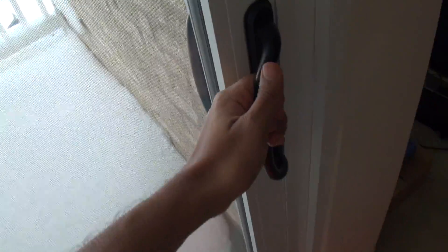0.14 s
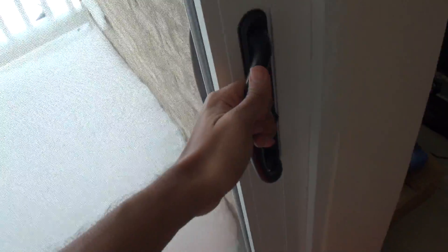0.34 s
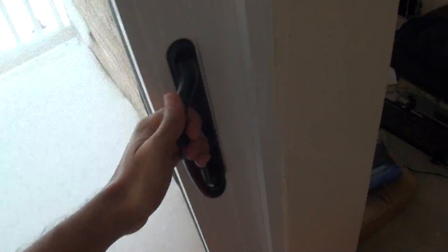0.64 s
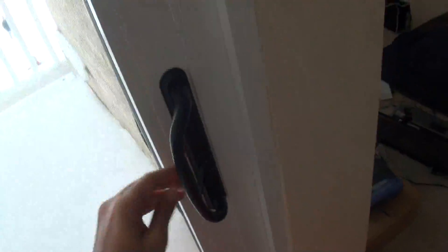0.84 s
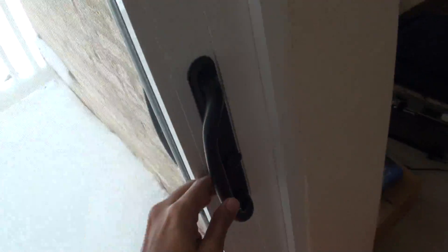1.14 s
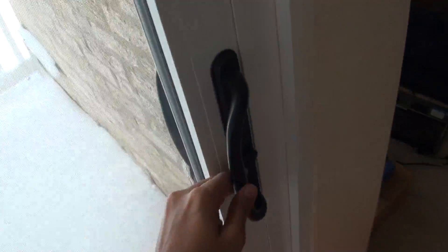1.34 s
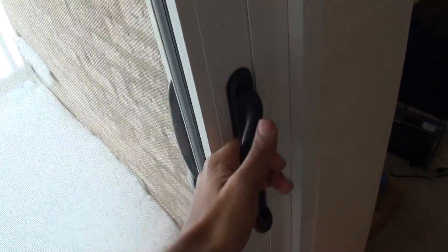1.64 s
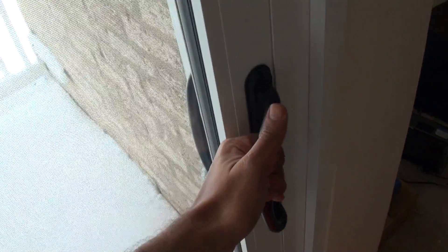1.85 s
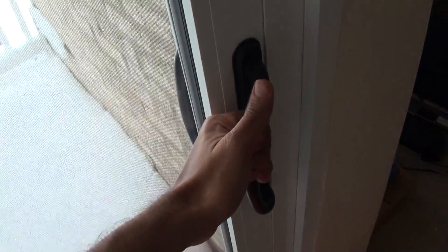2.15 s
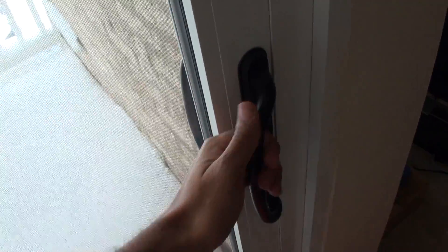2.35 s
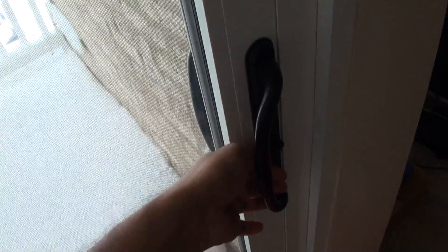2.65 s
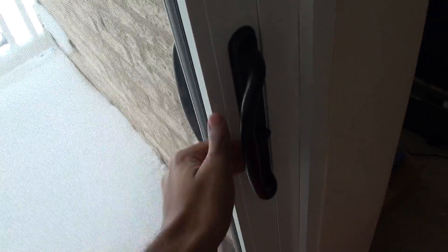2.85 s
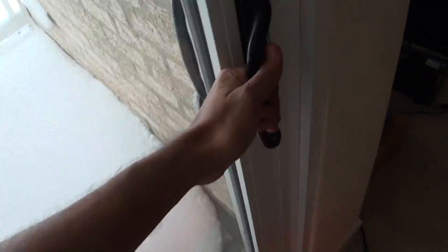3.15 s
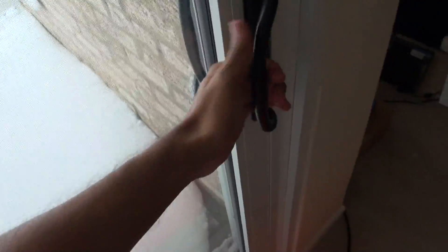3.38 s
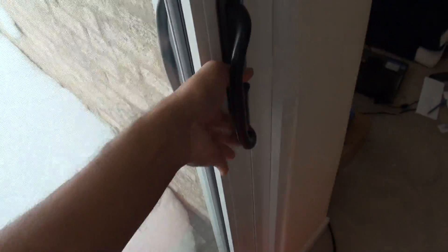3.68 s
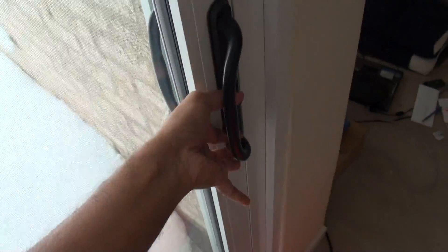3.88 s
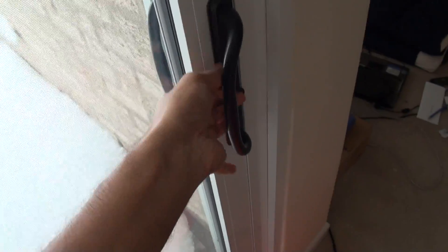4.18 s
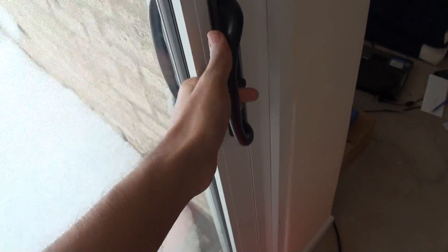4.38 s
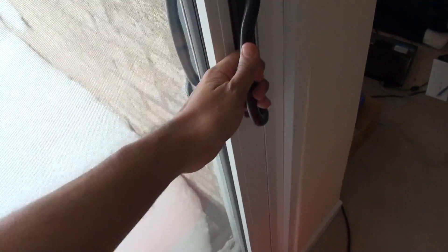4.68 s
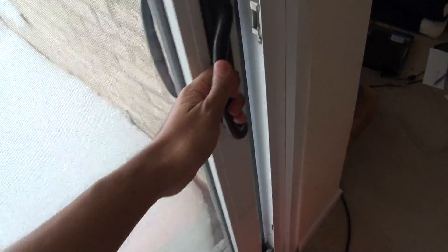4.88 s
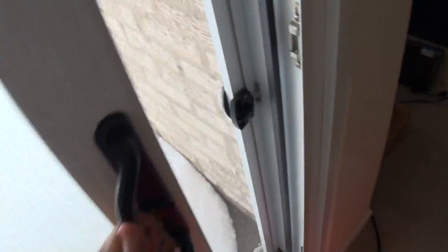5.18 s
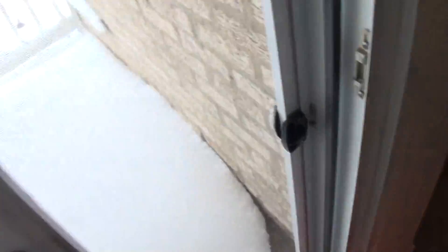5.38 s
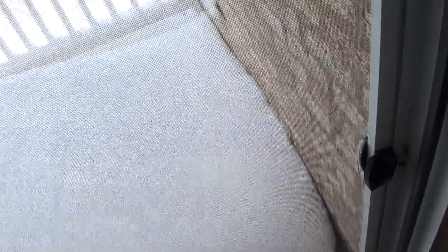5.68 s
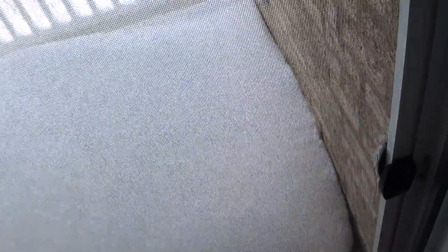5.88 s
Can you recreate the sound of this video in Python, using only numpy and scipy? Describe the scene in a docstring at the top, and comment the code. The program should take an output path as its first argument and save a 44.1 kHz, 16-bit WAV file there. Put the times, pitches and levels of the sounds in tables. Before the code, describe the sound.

In a quiet room with a faint low appliance drone, fingers rub a door grip close to a small stereo microphone. The metal latch clicks and the heavy panel thumps in irregular clusters, with tiny squeaks. After some quieter handling the latch jams with one loud, ragged rattle, then snaps sharply. A final deep thump frees the door, which rolls along its track with a rumbling, gritty scrape and easing hiss.

```python
"""Fingers rub a grip and a latch clicks: a hand works a sliding glass door in a quiet room, close to a
small stereo microphone. The heavy panel thumps, the latch once rattles hard, and at the end the door rolls
along its track. Struck parts are decaying sines with noise cracks; skin, rollers and seal are coloured
noise under level curves; the hits have a short room tail, and air and an appliance drone lie beneath."""
import sys
import numpy as np
from scipy import signal
from scipy.fft import rfft, irfft
from scipy.io import wavfile
from scipy.ndimage import uniform_filter1d

SR = 44100
rng = np.random.default_rng(int(sys.argv[2]) if len(sys.argv) > 2 else 0)


def file_out(sig):
    """Save sig as 16-bit WAV at sys.argv[1]."""
    # one column per channel
    cols = np.atleast_2d(sig).T
    # limit, then scale
    lim = np.clip(cols, -1, 1)
    pcm = np.round(lim * 32767).astype(np.int16)
    wavfile.write(sys.argv[1], SR, pcm)


N = 265702


def gain_of(db):
    """Decibels to gain."""
    return 10 ** (np.asarray(db) / 20)


def evened(x):
    """Scales to rms 1."""
    return x / np.sqrt(np.mean(x ** 2) + 1e-20)


def peaked(x):
    """Scales to peak 1."""
    return x / np.max(abs(x))


def early(x):
    """Scales so that the first few milliseconds have rms 1."""
    return x / np.sqrt(np.mean(x[:250] ** 2))


def read(points, hz):
    """Reads a spectrum on a log frequency axis."""
    f, value = np.transpose(points)
    return np.interp(np.log(hz + 1), np.log(f + 1), value)


def curve(rows):
    """All dB columns at every sample, silent outside the table."""
    s, *columns = np.transpose(rows)
    return [np.interp(np.arange(N) / SR, s, c, left=-200, right=-200) for c in columns]


def swell(start, rise, hold, fade_db_per_s):
    """Envelope: linear rise, hold, then a steady fall in dB."""
    t = np.arange(N) / SR - start
    return np.clip(t / rise, 0, 1) * gain_of(-fade_db_per_s * np.maximum(t - rise - hold, 0))


def add(mix, s, sound):
    """Mixes a sound in at time s."""
    part = mix[..., round(s * SR):][..., :sound.shape[-1]]
    part += sound[..., :part.shape[-1]]


def band(x, lo_hz, hi_hz):
    """Causal band-pass."""
    sos = signal.butter(2, [lo_hz, min(hi_hz, SR / 2.2)], "bandpass", fs=SR, output="sos")
    return signal.sosfilt(sos, x)


def ring(modes, seconds, damping=1, spread=.02):
    """Decaying sines of a struck body; each blow lands elsewhere and weights and detunes the modes anew."""
    t = np.arange(round(seconds * SR)) / SR
    chance = rng.standard_normal((len(modes), 2))
    out = 0
    for (hz, db, t60), (weight, detune) in zip(modes, chance):
        decay = gain_of(db + 2 * weight - 60 * t / (t60 * damping))
        out = out + decay * np.sin(2 * np.pi * hz * (1 + spread * detune) * t)
    return out


def grit(per_s, spread_db):
    """Sparse impacts of uneven size and random sign."""
    size = gain_of(spread_db * np.minimum(rng.exponential(1, N), 4))
    return size * (rng.random(N) < per_s / SR) * rng.choice([-1, 1], N)


# Stereo width by frequency, wide in the middle and treble, practically mono from 12 kHz up.
# Each row: frequency in Hz, left-right likeness (1 = identical).
STEREO_LIKENESS = [(60, .99), (150, 1), (380, 0.916), (950, 0.51), (2380, 0.53), (5000, 0.72), (8500, 0.66),
                   (10500, 0.46), (12000, 1), (16000, .99)]


def noise(spectrum, patchy_db, size=1024):
    """Two-channel noise of a given colour with drifting patches, rms 1."""
    frames, hz = N // (size // 4) + 5, np.fft.rfftfreq(size, 1 / SR)
    a, b, c, d, patches = rng.standard_normal((frames, len(hz), 5)).T
    patches = evened(uniform_filter1d(uniform_filter1d(patches, 10, 0), 8, 1))
    same = np.clip(read(STEREO_LIKENESS, hz), -1, 1)[:, None]
    left, other = a + 1j * b, c + 1j * d
    z = np.array([left, same * left + np.sqrt(1 - same ** 2) * other])
    z *= gain_of(read(spectrum, hz)[:, None] + patchy_db * patches)
    return evened(signal.istft(z, nperseg=size, noverlap=size * 3 // 4)[1][:, :N])


def stereo(pair, colour_db=0, near=0.):
    """Two unrelated signals become left and right; near sources sound more alike in both."""
    z, hz = rfft(pair), np.fft.rfftfreq(pair.shape[1], 1 / SR)
    same = np.clip(read(STEREO_LIKENESS, hz) * (1 - near) + near, -1, 1)
    right = same * z[0] + np.sqrt(1 - same ** 2) * z[1]
    return irfft(np.array([z[0], right]) * gain_of(colour_db), pair.shape[1])


# Colour of the room's air. Each row: frequency in Hz, relative level in dB per Hz.
AIR_COLOUR = [(15, -43), (25, -27), (90, -20), (122, -6.5), (143, -10), (183, -1.5), (261, -10.5),
              (383, -13), (517, -15.5), (593, -16.5), (698, -18.5), (845, -15), (1240, -22.5),
              (3130, -34.5), (17000, -41.5)]
# An appliance drones. Each row: frequency in Hz, middle level in dB rms.
DRONE_TONES = [(59.2, -79), (118.4, -66.5), (177.6, -61.5), (242.2, -64)]


def room_tone():
    """Steady air as coloured noise, plus a drone of sines whose levels waver."""
    t = np.arange(N) / SR
    drone = 0
    for hz, db in DRONE_TONES:
        waver = evened(uniform_filter1d(rng.standard_normal(N), 3000))
        level = np.sqrt(2) * gain_of(db + 1.7 * waver)
        drone += level * np.sin(2 * np.pi * (hz * t + rng.random()))
    return gain_of(-55.5) * noise(AIR_COLOUR, 0.83, size=2048) + drone


# How the room dies away. Each row: frequency in Hz, t60 in s.
ROOM_DECAY = [(200, 0.32), (1000, 0.35), (4000, 0.22), (8000, 0.12), (14000, 0.06)]


def room(x):
    """Room tail from sparse taps of random sign, each band dying at its own speed."""
    taps = np.zeros((2, SR))
    at = np.arange(300, SR - 20, 20) + rng.integers(0, 20, (2, (SR - 301) // 20))
    np.put_along_axis(taps, at, rng.choice([-1., 1.], at.shape), 1)
    hz, t, z = signal.stft(taps, SR, nperseg=256)
    z[1] = 0.74 * z[0] + 0.45 * z[1]  # left and right share much of the tail
    fade = gain_of(-60 * t / read(ROOM_DECAY, hz)[:, None])
    tail = signal.istft(z * fade, SR, nperseg=256)[1]
    return signal.fftconvolve(x[None], tail / np.linalg.norm(tail[0]), axes=1)[:, :N]


# The hand on the grip. Each row: time in seconds, skin hiss in dB, strain of the panel in dB.
GRIP_LEVELS = [(0, -49, -58), (.1, -47, -55), (.28, -57.5, -67), (.5, -58, -66.5), (.9, -62, -62.5),
               (1.3, -58.5, -65), (1.5, -66, -67), (1.88, -61.5, -59), (2.03, -47, -52), (2.17, -55.5, -58),
               (2.33, -63, -66), (2.55, -63, -55), (2.76, -67, -66), (2.95, -64.5, -58), (3.1, -63, -54),
               (3.36, -57, -67.5), (3.58, -65, -52.5), (3.8, -64, -58), (4.06, -64, -56.5),
               (4.41, -67, -65.5), (4.6, -61.5, -57), (4.7, -58, -67), (4.77, -53, -59), (4.82, -59, -57)]
# Fingers slide over the grip. Each row: start in seconds, hold after the rise in seconds,
# fine treble in dB, duller skin hiss in dB.
FINGER_STROKES = [(-.05, 0.13, -51, -51.5), (0.137, .1, -62, -62), (0.508, 0.087, -70, -69),
                  (0.713, 0.09, -67, -58), (1.036, .09, -66, -64), (1.497, 0.13, -69.5, -78),
                  (1.97, .13, -60, -62), (2.381, 0.074, -66, -64), (2.823, 0.026, -69, -64),
                  (2.94, 0.045, -62.5, -70), (3.328, 0.13, -64.5, -65), (3.68, 0.029, -80, -78),
                  (4.494, 0.035, -67, -60), (4.733, 0.036, -68, -54.5)]
# The leaf groans under load. Each row: frequency in Hz, relative level in dB per Hz.
GROAN_COLOUR = [(20, -37), (50, 1), (90, -2.5), (130, -10), (300, -54)]


def hand():
    """Skin hisses on the grip, brighter with each stroke, and the grip's load makes the panel groan low."""
    rise_s, fade_db_per_s, resting_db = 0.015, 148, -73
    level, strain = gain_of(curve(GRIP_LEVELS))
    bright, dull = sum(gain_of(db)[:, None] * swell(s, rise_s, length, fade_db_per_s)
                       for s, length, *db in FINGER_STROKES)
    # both colours: frequency in Hz, relative level in dB per Hz
    skin_colour = [(500, -3.5), (1500, -4.0), (3500, -6), (5500, -8.0), (9000, -20), (14000, -39)]
    fine_colour = [(4000, -22), (6500, -0.5), (11000, 0.5), (15000, -4.5), (17000, -19)]
    skin = noise(skin_colour, 2.1, size=256)
    fine = noise(fine_colour, 1.8, size=256)
    groan = noise(GROAN_COLOUR, 0.41, size=2048)
    return np.hypot(level, dull) * skin + (bright + gain_of(resting_db)) * fine + strain * groan


# The latch lever squeaks as it turns. Each row: start in seconds, length in seconds,
# mode in Hz, level in dB rms before the ends are tapered.
LEVER_SQUEAKS = [(.54, .024, 4500, -62), (.602, .051, 4000, -65), (.595, .05, 6300, -66),
                 (.63, .045, 5550, -63), (.626, .027, 2400, -66), (.74, .029, 2450, -64),
                 (.991, .02, 6020, -58), (.99, .011, 3570, -58), (1.04, .045, 6170, -56),
                 (1.04, .02, 5070, -56), (1.045, .06, 8700, -65), (1.058, .025, 3620, -65),
                 (1.085, .045, 6200, -63), (1.045, .07, 11000, -68), (1.104, .02, 3700, -58),
                 (1.11, .04, 2400, -69), (2.395, .05, 7150, -67), (3.552, .06, 7450, -67),
                 (3.56, .13, 5000, -74), (3.822, .15, 4970, -74), (3.83, .13, 4140, -74),
                 (4.181, .018, 6330, -34)]


def squeaks():
    """Friction keeps one mode of the latch singing, fuzzy and uneven: narrow-band noise."""
    out = np.zeros(N)
    for s, length, hz, db in LEVER_SQUEAKS:
        settle = 4000  # samples dropped while the filter builds up
        fuzz = band(rng.standard_normal(settle + round(length * SR)), hz - 110, hz + 110)[settle:]
        add(out, s, gain_of(db) * evened(fuzz) * signal.windows.tukey(len(fuzz), .4))
    return out


# The door rolls on its track. Each row: time in seconds, rumble in dB, upper rumble in dB,
# fine brushing in dB.
ROLL_LEVELS = [(4.81, -46, -46, -52), (4.85, -49, -52.5, -48.5), (4.924, -47.5, -50, -61),
               (5.03, -39.5, -44, -55.5), (5.25, -39, -39.5, -55), (5.45, -37.5, -41, -52),
               (5.55, -36.5, -44, -55), (5.67, -38.5, -44.5, -53), (5.73, -40.5, -45, -57.5),
               (5.914, -47, -48, -52), (6.03, -46, -48.5, -49.5)]
# Colours of the low rumble, upper rumble, grinding, seal hiss and fine brushing.
# Each row: frequency in Hz, relative level in dB per Hz.
RUMBLE_COLOUR = [(65, -46), (110, -14), (210, 10.5), (248, -1.5), (306, 6.5), (340, -5), (440, -48),
                 (750, -120)]
UPPER_COLOUR = [(190, -42), (330, -3.5), (387, 2.5), (435, -8), (510, -1.5), (606, -14), (680, -16.5),
                (880, -31), (1500, -120)]
GRIND_COLOUR = [(380, -12), (650, -1.5), (889, -0.5), (1090, 0.5), (1360, 0.5), (1470, 1), (1650, -3.5),
                (2030, -6.5), (2600, -20), (3380, -34), (5720, -120)]
HISS_COLOUR = [(1290, -15), (2200, 2), (2790, -6), (3050, 0), (3420, -6), (4940, -7.5), (5530, -7),
               (8500, -14.5), (11000, -29), (18700, -120)]
BRUSH_COLOUR = [(4710, -13), (8000, -5), (10800, -11.5), (11800, -10.5), (13100, -14), (15900, -22),
                (17000, -27)]
# Modes of the glass panel, rolled or thumped. Each row: frequency in Hz, relative level in dB,
# undamped t60 in s.
PANEL_MODES = [(140, -17, 0.18), (164, -1.5, 0.13), (210.3, 8.5, 0.17), (245.5, 3.5, 0.22),
               (283, 4.5, 0.11), (383, 11, 0.057)]


def rolling():
    """Rollers bump over grit and shake the panel; the seal brushes the track."""
    rumble_db, upper_db, brush_db = curve(ROLL_LEVELS)
    start, moving = ROLL_LEVELS[0][0], rumble_db > -100
    swing_db = rumble_db - -38.5  # against the rumble at full speed
    # level in dB at full speed, and share of the rumble's swing
    grind = moving * gain_of(-45.5 + 0.56 * swing_db)
    hiss = moving * gain_of(-51.5 + 0.23 * swing_db)
    lurch = gain_of(-33) * swell(start, 0.0021, 0, 603)  # the rollers break free with a jerk
    sway = gain_of(-45.5) * swell(start, .003, 0, 70) + moving * gain_of(-56)

    bumps = evened(signal.oaconvolve(grit(130, 2.8), ring(PANEL_MODES, .1, 0.63))[:N])
    ticks = evened(band(grit(110, 2.4), 1200, 7300))
    rumble = evened(noise(RUMBLE_COLOUR, 2.0, size=2048) + 0.04 * bumps)
    low = (gain_of(rumble_db) + lurch) * rumble
    low += gain_of(upper_db) * noise(UPPER_COLOUR, 0.68)
    seal = hiss * (noise(HISS_COLOUR, 1.2, size=256) + 0.29 * ticks)
    seal += gain_of(brush_db) * noise(BRUSH_COLOUR, 0.92, size=256)
    scrape = evened(uniform_filter1d(rng.standard_normal(N), 900))
    seal *= gain_of(1.25 * scrape)  # the seal catches unevenly
    grinding = (grind + 0.22 * lurch) * noise(GRIND_COLOUR, 2.4)
    return low + grinding + seal + sway * noise(GROAN_COLOUR, 1.0, size=2048)


# Pushes and pulls that shake the panel. Each row: start in seconds, peak of the middle modes in dB,
# centre of the modes struck in Hz, peak of the deep sway in dB, factor on t60 (at least 0.2 is used).
PANEL_THUMPS = [(0.139, -32.5, 207, -57, 0.44), (0.2406, -25.5, 332, -42, 0.17),
                (0.252, -35.5, 169, -48, 0.41), (1.752, -29.5, 222, -47.5, 0.92),
                (1.993, -34, 295, -42, 0.39), (2.017, -36.5, 302, -61, 0.88), (2.044, -36, 257, -57, 1),
                (2.497, -40.5, 260, -61, 0.69), (2.588, -35, 233, -51, 0.52),
                (2.943, -42.5, 200, -37.5, 0.99), (3.064, -32, 207, -41, 1), (3.256, -38.5, 266, -60, 0.19),
                (3.547, -38.5, 232, -53, 0.76), (3.663, -43.5, 250, -58, 1), (3.987, -36.5, 212, -55, 0.96),
                (4.126, -34, 220, -51, 0.84), (4.16, -40, 332, -61, 0.72), (4.795, -26.5, 200, -27.5, 0.43)]
# The whole leaf on its rollers. Each row: frequency in Hz, relative level in dB, undamped t60 in s.
SWAY_MODES = [(52.7, -12, 1), (95.4, 4.5, 0.29), (116, -3.5, 0.31)]


def thumps():
    """A padded blow rings the panel around the modes it strikes and sets the whole leaf swaying."""
    out, padding = np.zeros(N), np.hanning(round(0.0021 * SR))
    for s, panel_db, centre_hz, sway_db, damping in PANEL_THUMPS:
        t60_factor = max(damping, .2)
        blow = np.convolve(ring(PANEL_MODES, .3, t60_factor, 0.028), padding)
        panel = band(blow, centre_hz / 1.33, centre_hz * 1.38)
        add(out, s, gain_of(panel_db) * peaked(panel))
        sway = band(ring(SWAY_MODES, .6, t60_factor, 0.1), 39, 118)
        add(out, s, gain_of(sway_db) * peaked(sway))
    return out


# Modes of the metal latch. Each row: frequency in Hz, relative level in dB, t60 in s (not used).
LATCH_MODES = [(1710, -5.5, 0.07), (2570, -16, 0.02), (3730, -1.5, 0.12), (3930, -21, 0.034),
               (5130, 16.5, 0.038), (6050, -1, 0.035), (7300, 13, 0.018), (8400, -13, 0.084),
               (9400, -34, .03), (10750, 17, 0.06)]


def metal_db(hz, lift_db, width_hz):
    """The latch modes as bumps on a spectrum, in dB."""
    bumps = sum(gain_of(db) / (1 + ((hz - f) / width_hz) ** 2) for f, db, t60 in LATCH_MODES)
    return lift_db * (np.minimum(bumps, 1) - .35)


# Modes of the door frame. Each row: frequency in Hz, relative level in dB, t60 in s before scaling.
FRAME_MODES = [(407, -5, 0.031), (590, 0, 0.029), (740, 7, 0.034), (957, -6.5, 0.07), (1090, -11, 0.054),
               (1227, -16, 0.09), (1580, -47, 0.0092)]
# Colour of the rattle. Each row: frequency in Hz, relative level in dB per Hz.
CHATTER_COLOUR = [(120, -38), (200, -18), (269, -20), (348, -7.5), (468, -12.5), (829, 1), (943, -5),
                  (1110, -2.5), (1940, -7), (2370, -4), (3430, -7), (6200, -7), (8490, -11.5), (12700, -14),
                  (16500, -37)]


def rattle():
    """Dense chatter of loose parts, coloured by latch and frame; treble and body fade at their own pace."""
    jam_s, loose_s = 4.153, 4.179
    # the latch jams: a short hard burst; then loose parts chatter and settle
    level = gain_of(-22.5) * swell(jam_s, 0.0072, .016, 5000)
    level += gain_of(-30.5) * swell(loose_s, 0.0027, 0.053, 121)
    level *= gain_of(1.6 * evened(uniform_filter1d(rng.standard_normal(N), 200)))  # the chatter is ragged
    treble = gain_of(4) * swell(jam_s, .001, 0, 99)
    body = gain_of(2) * swell(jam_s, .001, 0, 16)

    hz = np.fft.rfftfreq(N, 1 / SR)
    chatter = 0.51 * evened(grit(3500, 1.4)) + stereo(rng.standard_normal((2, N)), near=0.28)
    frame = ring(FRAME_MODES, .1, 2.8, spread=.003)
    chatter += 0.034 * evened(signal.oaconvolve(chatter, frame[None])[:, :N])
    z = rfft(chatter) * gain_of(read(CHATTER_COLOUR, hz) + metal_db(hz, 4.6, 54))
    z /= np.sqrt(np.mean(irfft(z, N) ** 2))
    lows, highs = 1 / (1 + (hz / 1500) ** 4), 1 / (1 + (6500 / (hz + 1)) ** 4)
    middle = irfft(z * (1 - lows - highs), N)
    return level * (body * irfft(z * lows, N) + middle + treble * irfft(z * highs, N))


# Clicks of latch and handle. Each row: start in seconds, frame knock in dB, crack in dB before colouring,
# brightness in dB per octave, mode struck hardest in Hz, t60 in s, left minus right in dB.
LATCH_CLICKS = [(.1342, -52, -39.5, -4, 3710, 0.06, 0), (0.226, -61, -34.5, -4.5, 3500, 0.036, -3),
                (.241, -28, -35, -1, 2440, 0.048, -2.5), (0.3571, -43, -33, -6, 2680, 0.068, 4.5),
                (0.3916, -60, -45.5, -3, 5450, 0.05, -1), (.5939, -56, -49, -3, 4060, .025, 4),
                (0.627, -58.5, -48, -4, 2620, .022, 6), (0.8329, -68, -49.5, -5, 1790, .027, 2),
                (.995, -47, -44.5, 1.3, 6080, .044, 1), (1.0403, -54, -45, 2.5, 6150, 0.045, 1),
                (1.1136, -74, -51, -1, 3650, .055, 0), (1.177, -45.5, -21, -4, 5100, 0.041, .5),
                (1.2407, -70, -43.5, -2, 3600, .03, -2), (1.335, -54, -47, -5.5, 4960, 0.032, 1),
                (1.7407, -51, -41, -5, 2210, 0.041, -3), (1.749, -37, -38.5, -4.5, 4220, 0.076, -1),
                (1.9156, -49.5, -67, -3, 1500, .028, -3), (1.931, -50, -43, -10, 2500, .034, 6),
                (1.9683, -44, -61, -5, 1790, 0.13, 0), (1.9869, -47, -34.5, -11, 4050, .053, 5),
                (1.9927, -30.5, -27, -3, 1480, .097, -2.5), (2.0018, -31, -23, 6, 1840, 0.018, -2),
                (2.024, -57, -48, -.3, 3640, .07, -1), (2.0365, -48, -43.5, 3, 5330, .061, 1),
                (2.066, -39.5, -35, -4, 1610, 0.031, -3), (2.0845, -47, -35.5, -6, 1940, 0.042, 6),
                (2.4957, -49, -65, 8, 2950, 0.062, 1), (2.558, -55, -30, -1, 3950, 0.041, 1),
                (2.578, -45.5, -50, -7, 1500, .03, 0), (2.5845, -43, -33, -6, 3620, 0.025, -.5),
                (2.8394, -63, -45.5, 6, 5200, 0.012, 0), (2.8464, -58, -42, -2, 5400, .045, 1),
                (2.8757, -71, -48, 6.5, 8100, 0.016, 0), (2.9373, -55, -53.5, 3.5, 1810, 0.12, 0),
                (3.0546, -45, -41, -10, 2430, 0.027, 2.5), (3.0625, -44, -31.5, -6.5, 3600, 0.031, 0.5),
                (3.363, -59, -48.5, -2, 1850, 0.14, 2), (3.478, -57, -42.5, -2, 5160, .045, 0),
                (3.487, -62, -38.5, -6, 1950, 0.037, 0), (3.5276, -51, -49, -4, 3770, 0.083, 0),
                (3.5449, -41.5, -30.5, -5, 4900, 0.032, -1.5), (3.985, -49, -46, -7.5, 3800, 0.06, -2.5),
                (3.999, -55, -48.5, -2.5, 6100, 0.038, 1), (4.1238, -46, -40, -5.5, 1860, 0.033, 1),
                (4.131, -39, -32, -8, 5960, 0.052, 1), (4.153, -37, -38, -3, 4970, 0.018, 0),
                (4.1805, -48, -20.5, 1.3, 6150, 0.024, -1), (4.198, -42, -27, -5, 5780, .043, 0),
                (4.4468, -66, -48, -8, 3420, .06, -4), (4.4916, -39.5, -17.5, -2.5, 5970, 0.034, 0),
                (4.765, -48, -47, -7, 1670, 0.026, 1), (4.7792, -64, -40.5, 0.5, 8100, 0.04, -1),
                (4.7942, -40, -31, 0, 2540, 0.072, 2.5), (4.8772, -41, -35, -5, 2150, 0.036, -1),
                (4.9284, -42, -37, -5.5, 2100, 0.034, 1), (4.9557, -53, -37.5, -4.5, 2870, 0.04, 0),
                (4.983, -57, -41, -5, 3030, 0.095, -1), (5.0115, -41.5, -44, -7, 1800, .034, 4),
                (5.047, -50, -40.5, -6, 3400, 0.039, 2), (5.0914, -54, -40, -4, 3960, .023, 1),
                (5.679, -39.5, -39, -12.5, 1500, 0.11, 4)]
# Shared colour of a crack. Each row: frequency in Hz, relative level in dB.
CRACK_COLOUR = [(600, -20.5), (1300, -2.5), (2100, -4), (3900, -1), (6700, -3), (12000, -6.5), (17000, -20)]


def clicks():
    """A contact, softer for longer clicks, then a dying crack and ringing latch; the blow knocks the frame."""
    out, t = np.zeros((2, N)), np.arange(4096) / SR
    seconds = len(t) / SR
    hz = np.fft.rfftfreq(len(t), 1 / SR)
    octaves = np.log2(np.clip(hz, 2000, 13000) / 3900)
    for s, knock_db, crack_db, tilt_db, struck_hz, t60, pan_db in LATCH_CLICKS:
        colour_db = crack_db + tilt_db * octaves + read(CRACK_COLOUR, hz) + metal_db(hz, 1.7, 176)
        colour_db += 5.2 / (1 + ((hz - struck_hz) / 220) ** 2)
        fade = gain_of(-60 * t / max(t60, .004)) + 1.26 * gain_of(-60 * t / 0.0076)
        fade *= np.minimum(t / (0.034 * t60), 1)  # longer clicks start more softly
        crack = stereo(rng.standard_normal((2, len(t))), colour_db, near=0.86) * fade
        modes = [(f, np.interp(f, hz, colour_db) - 6.5, min(.4 * t60, .017))
                 for f in [struck_hz, *np.transpose(LATCH_MODES)[0]]]
        crack += ring(modes, seconds, spread=0.026) * np.minimum(t / 0.001, 1)
        knock = early(band(ring(FRAME_MODES, seconds, 0.51 + 8.0 * t60, spread=0.021), 316, 1600))
        knock += 0.31 * early(band(rng.standard_normal(len(t)) * fade, 270, 1020))
        pan = gain_of([[pan_db / 2], [-pan_db / 2]])
        add(out, s, (crack + gain_of(knock_db) * knock) * pan)
    return out


def scene():
    """Door sounds over the room tone; only the clicks, rattle, thumps and squeaks have a room tail."""
    hits = clicks() + rattle() + thumps() + squeaks()
    tail = gain_of(-14.5) * room(hits.mean(0))
    return hits + tail + hand() + rolling() + room_tone()


def record(dry):
    """The microphone drops the lowest bass below 27 Hz; then a steep low-pass limits the band."""
    thinned = signal.sosfilt(signal.butter(2, 27, "highpass", fs=SR, output="sos"), dry)
    edge_hz = 16700
    low_pass = signal.firwin(255, edge_hz, window=("kaiser", 9), fs=SR)
    return signal.oaconvolve(thinned, low_pass[None], "same")


dry = scene()
out = record(dry)
file_out(out)
```